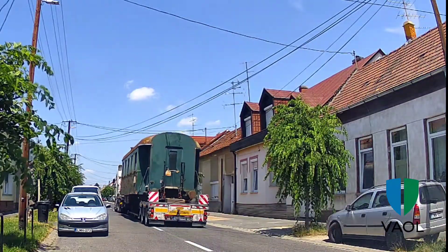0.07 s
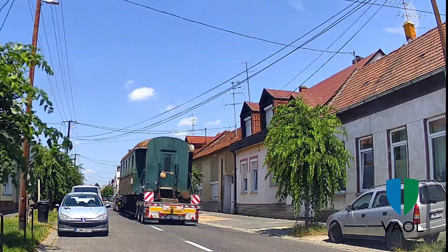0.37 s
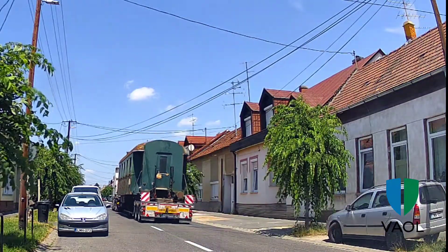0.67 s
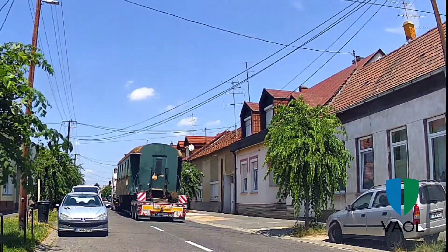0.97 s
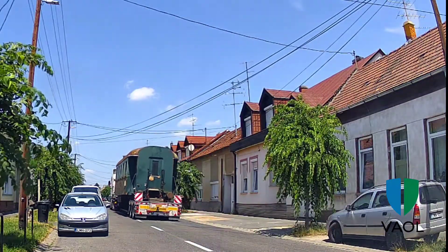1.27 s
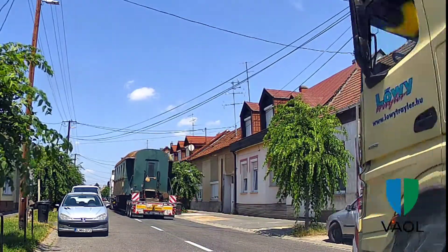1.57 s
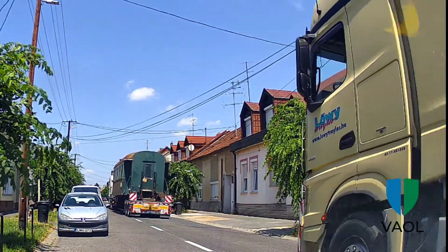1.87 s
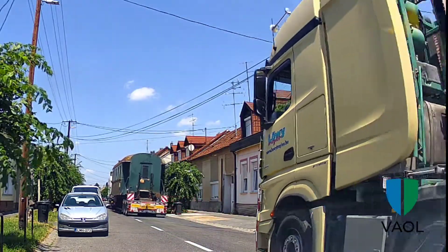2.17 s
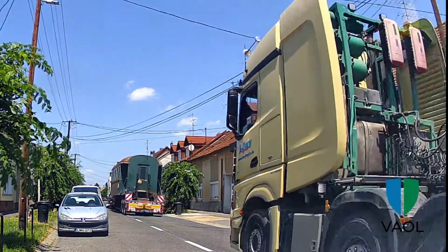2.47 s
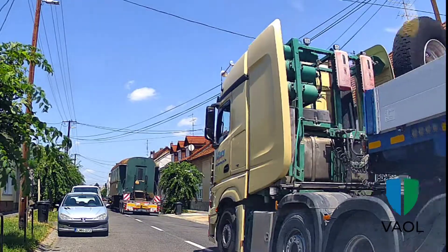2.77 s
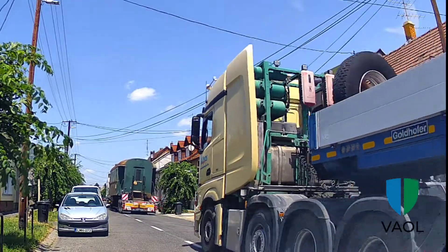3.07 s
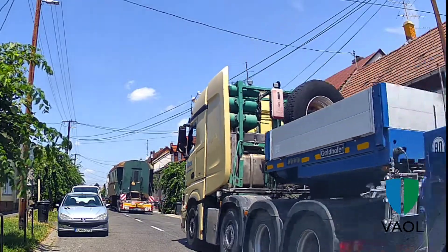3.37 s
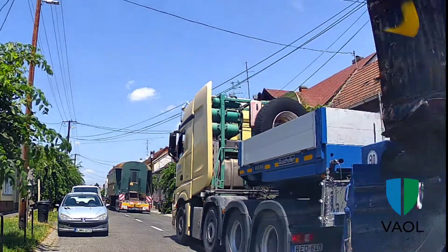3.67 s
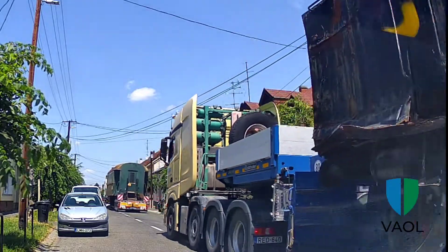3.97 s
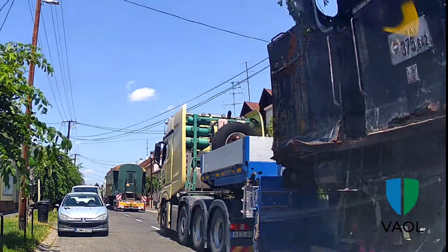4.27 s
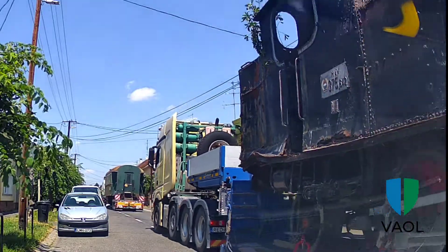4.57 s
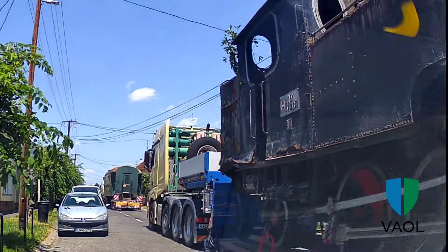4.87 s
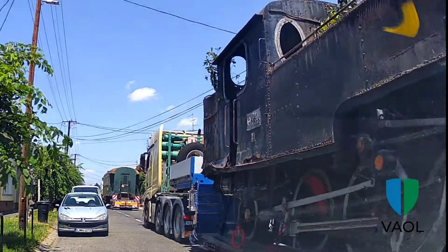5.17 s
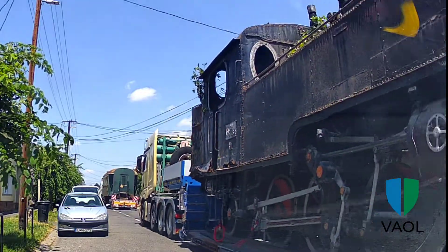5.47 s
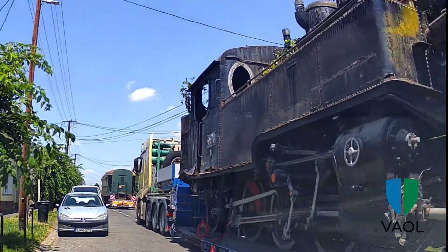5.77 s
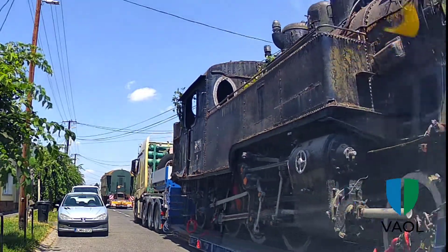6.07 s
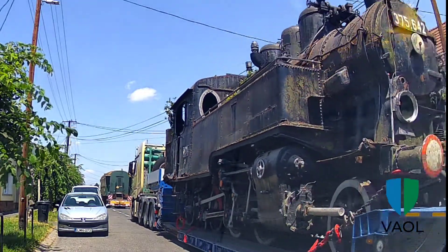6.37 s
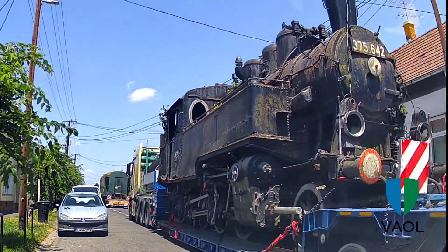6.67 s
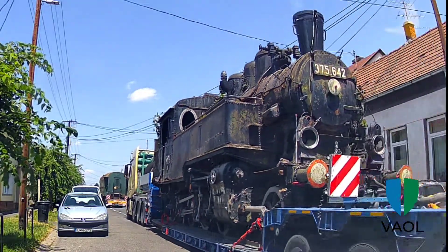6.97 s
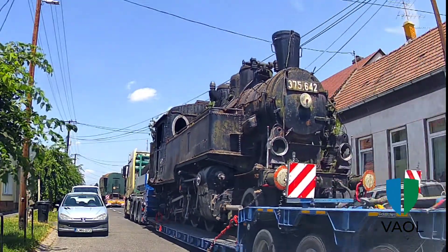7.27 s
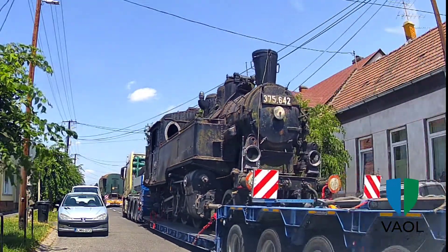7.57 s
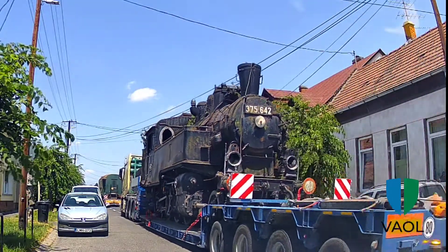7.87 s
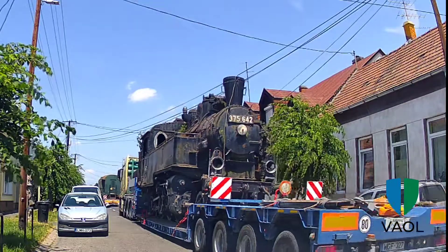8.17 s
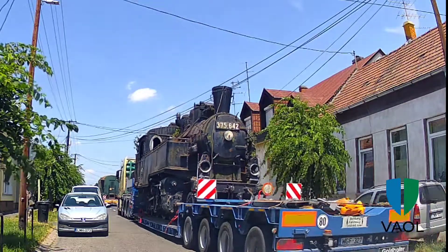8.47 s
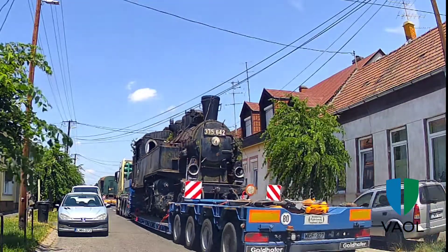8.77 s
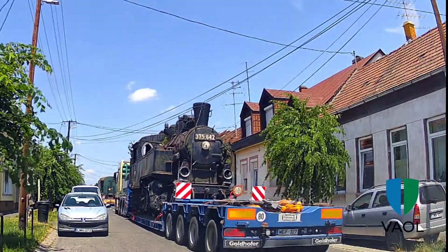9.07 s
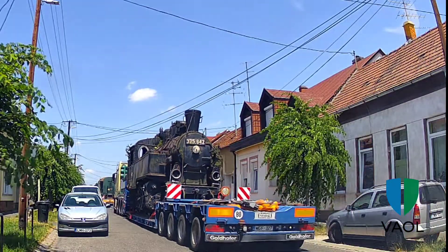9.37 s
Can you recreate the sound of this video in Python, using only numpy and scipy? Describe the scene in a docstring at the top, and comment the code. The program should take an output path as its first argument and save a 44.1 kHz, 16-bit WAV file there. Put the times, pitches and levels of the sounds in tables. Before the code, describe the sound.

The sound is heard from inside a closed, parked car and lasts about nine and a half seconds. From the start, air rushes evenly through the vents with a faint thin whine, over the low hum of the idling engine and fan. A heavy truck crawling past outside comes through as a dull, throbbing rumble that booms in the cabin throughout. A few soft, dull thuds sound in the car's body, near 0.1, 1.3, 2.1, 2.8, 6.8 and 8.5 seconds. Around 3 seconds a faint roar swells and fades as the tractor unit goes by; it swells again briefly near 6.4 seconds with the trailer's axles. Two faint, thin ringing tones from the truck come and go all along. The rumble lifts slightly near 4.5 and 9 seconds, but the overall level stays nearly steady to the end.

```python
"""Inside a parked car, a heavy truck crawling past outside. From the start air rushes through the vents
over the low tones of the four-cylinder idle and the blower wheel, while the closed body passes the street
as a dull, throbbing rumble with a few thuds. Near 3 s the tractor unit goes by and a faint roar swells;
near 6.4 s it swells again, briefly, with the trailer's axles. Two thin rings from the truck come and go
to the end, and the cabin booms on."""
import sys
import numpy as np
from scipy import signal
from scipy.fft import rfft, irfft, next_fast_len
from scipy.io import wavfile

SR = 44100
rng = np.random.default_rng(int(sys.argv[2]) if len(sys.argv) > 2 else 0)


def put_to_file(sound):
    """Save the sound as 16-bit audio at rate SR, in the file named by the first command-line argument."""
    columns = np.atleast_2d(sound).T  # one column per channel
    safe = np.clip(columns, -1, 1)
    whole_steps = np.round(safe * 32767)
    wavfile.write(sys.argv[1], SR, whole_steps.astype(np.int16))


N = 420273
TIME = np.arange(N) / SR


# spectra of the cabin air, the body and the panels: (frequency [Hz], relative density [dB])
BOOM_SPECTRUM = [(8, -33), (22, -27.5), (31, -20.5), (38, -6), (47, 0), (53, 0.5), (59, -1.5), (68, -3.5),
                 (85, -13.5), (130, -53.5)]
BODY_SPECTRUM = [(45, -33), (68, -9.5), (85, -2.5), (115, 0), (143, 1), (158, 0), (175, 1), (205, -2),
                 (225, -1), (243, -7.5), (290, -25.5), (400, -53.5)]
PANEL_SPECTRUM = [(150, -44.5), (240, -10.5), (255, -3), (268, 0), (302, -1.5), (330, -6), (362, -8),
                  (385, -5), (418, -8.5), (455, -15.5), (600, -42.5)]
# body rumble, nearly steady, swelling briefly near 4.5 s and 9.1 s: (time [s], level [dB])
BODY_LEVEL = [(0, -50.5), (0.8, -50.5), (1.9, -51), (2.1, -50), (3.2, -49.5), (4.1, -50.5), (4.45, -47.5),
              (4.9, -50.5), (6.1, -49.5), (6.4, -50.5), (7.0, -49), (8.3, -51), (8.7, -49.5), (9.1, -46.5),
              (9.3, -51), (9.53, -51)]
# panel drone: (time [s], level [dB])
PANEL_LEVEL = [(0, -52.5), (4.9, -53.5), (5.4, -52), (6.0, -52.5), (6.4, -51), (6.7, -51.5), (7.1, -51),
               (7.5, -53), (9.53, -53)]
# lulls of the boom, and of body and panels together: (centre time [s], duration [s], gain [dB])
BOOM_LULLS = [(0.6, .25, -7), (0.84, 0.23, -9), (1.76, .14, -8), (4.72, .22, -8), (5.39, .18, -6),
              (6.79, .25, -9), (8.72, 0.3, -13), (9.29, .2, -8)]
BODY_LULLS = [(0.02, .14, -1), (1.91, 0.24, -2.5), (2.69, .12, -5), (8.11, 0.15, -3), (8.41, 0.051, -4)]

def rumble(boom_db=-55.5):
    """Forced vibration: engines drive the low resonances of the cabin air, the body and its panels."""
    lull_db = swells(BODY_LULLS)
    boom = heaving(BOOM_SPECTRUM, boom_db + swells(BOOM_LULLS), calm=0.4, window_s=0.088)
    body = heaving(BODY_SPECTRUM, level_curve(BODY_LEVEL) + lull_db, calm=0.45, window_s=0.065)
    panels = heaving(PANEL_SPECTRUM, level_curve(PANEL_LEVEL) + lull_db, calm=0.39, window_s=0.082)
    return boom + body + panels


# soft throbs of the rumble: (crest time [s], frequency [Hz], duration [s], crest level [dB])
THROBS = [(0.669, 171, .09, -47.5), (0.93, 114, 0.11, -47.5), (1.589, 56, 0.12, -45),
          (1.59, 158, 0.072, -48), (1.859, 55, .1, -50), (2.022, 202, 0.049, -50), (2.53, 151, 0.14, -45),
          (2.775, 136, 0.051, -44), (3.058, 52, 0.17, -45.5), (3.104, 350, 0.092, -52.5),
          (3.18, 278, .09, -49), (3.256, 130, 0.081, -43), (3.411, 140, .07, -46), (3.654, 188, 0.085, -43),
          (3.679, 374, 0.17, -53), (3.869, 174, 0.076, -42), (4.306, 54, 0.13, -48),
          (4.393, 290, 0.12, -48.5), (5.1, 54, .13, -48), (5.383, 194, 0.11, -47),
          (5.934, 122, 0.09, -48.5), (6.27, 290, .09, -49), (6.37, 168, 0.098, -47), (6.407, 52, 0.25, -51),
          (6.57, 178, .09, -49), (6.82, 310, .1, -49), (6.905, 290, 0.062, -47), (6.933, 54, 0.17, -47.5),
          (7.672, 54.3, .14, -46), (7.715, 285, 0.098, -46), (7.894, 58, .07, -45.5), (8.004, 58, .06, -43),
          (8.165, 115, .05, -46.5), (8.26, 278, .11, -50.5), (8.552, 54, .15, -48),
          (8.911, 121, 0.086, -46), (8.986, 174, 0.12, -48.5)]

def throbs(spread_octaves=0.18):
    """Amplitude modulation: a narrow band of the rumble swells and sinks under a raised cosine."""
    size = SR // 2
    t = (np.arange(size) - size / 2) / SR
    hz = np.fft.rfftfreq(size, 1 / SR)
    out = np.zeros(N)
    for crest_s, pitch_hz, length_s, db in THROBS:
        swell = hump(t, length_s)
        band = np.exp(-.5 * (np.log2((hz + 1) / pitch_hz) / spread_octaves) ** 2)
        band_noise = irfft(rfft(rng.standard_normal(size)) * band, size)
        carrier = np.cos(np.angle(signal.hilbert(band_noise)))  # random phase, constant amplitude
        throb = irfft(rfft(swell * carrier) * np.sqrt(band), size)
        throb *= np.linalg.norm(swell) / np.linalg.norm(throb)
        add(out, crest_s + t[0], gain_of(db) * throb)
    return out


# dull thuds in the car's body: (time [s], frequency [Hz], peak level [dB])
THUDS = [(0.108, 194, -38.5), (1.334, 291, -38.5), (2.097, 203, -36), (2.837, 156, -34.5),
         (6.798, 335, -39.5), (8.467, 174, -35.5)]

def thuds(rise_s=0.0044, t60_s=0.097, sag=0.06):
    """Damped free vibration: a jolted panel rings briefly, sagging in pitch as it decays."""
    t = np.arange(SR // 4) / SR
    decay = gain_of(-60 * np.maximum(t - rise_s, 0) / t60_s)
    envelope = np.minimum(t / rise_s, 1) * decay
    glide = 1 + sag * (2 * decay - 1)
    out = np.zeros(N)
    for start_s, pitch_hz, db in THUDS:
        turns = np.cumsum(pitch_hz * glide) / SR
        add(out, start_s, gain_of(db) * envelope * np.sin(2 * np.pi * turns))
    return out


# rush of air at the vents: (frequency [Hz], relative density [dB])
AIR_SPECTRUM = [(20, -26.5), (120, -1.5), (480, -0.5), (950, -1), (1100, -7), (1350, -6.5), (1530, -10),
                (2150, -10), (2750, -15), (3050, -19), (4000, -17.5), (5100, -20.5), (6200, -17.5),
                (7600, -24.5)]
# resonances of ducts, vents and windscreen, and notches between: (frequency [Hz], width [Hz], gain [dB])
DUCT_RESONANCES = [(597, 42, 3), (699, 55, 3), (804, 36, 3), (872, 35, 3), (1010, 80, 2.5), (1053, 26, 4),
                   (1172, 94, 4.5), (1267, 81, 2.5), (1440, 85, 4.5), (1685, 71, 4.5), (1920, 44, 1),
                   (2095, 55, 4), (2232, 70, 3), (2379, 252, 10), (2548, 55, 4), (2664, 66, 6),
                   (2824, 190, 3), (3230, 87, 5), (3477, 83, 5), (3670, 310, 4), (4400, 170, 1.5),
                   (6850, 94, 4), (7300, 180, 2.5)]
DUCT_NOTCHES = [(755, 28, -1.5), (1340, 30, -2), (1531, 26, -3), (2003, 37, -1.5), (2150, 34, -2),
                (2710, 46, -2)]

def vents(level_db=-52, flutter_db=0.29):
    """Turbulence: an almost even airflow makes broadband noise, filtered by its path into the cabin."""
    def colour(hz):
        path_db = sum(db * .5 ** ((2 * (hz - centre) / width) ** 2)
                      for centre, width, db in DUCT_RESONANCES + DUCT_NOTCHES)
        return spectrum_at(AIR_SPECTRUM, hz) + path_db
    return gain_of(level_db + flutter_db * drift(5.5)) * noise(colour)


# engine (two firings a turn) and blower wheel: (order [multiple of shaft speed], rms level [dB])
IDLE_ORDERS = [(1, -78), (2, -68), (3, -75), (4, -61.5), (8, -71.5)]
BLOWER_ORDERS = [(1, -62), (2, -62), (3, -67.5)]
# faint steady hums: (frequency [Hz], rms level [dB])
HUMS = [(97.5, -65.5), (286, -65.5), (596.5, -73.3), (684, -76.5)]

def machines(crank_hz=13.05, blower_hz=59.55):
    """Periodic excitation: engine and blower sound at multiples of their shaft speeds, beside four hums."""
    engine = shaft(crank_hz, IDLE_ORDERS, wander=.002, waver_db=1.0)
    blower = shaft(blower_hz, BLOWER_ORDERS, wander=.0015, waver_db=-1.5)
    hums = sum(shaft(hz, [(1, db)], wander=.00098, waver_db=1.0) for hz, db in HUMS)
    return engine + blower + hums


# the truck's midrange roar: (frequency [Hz], relative density [dB])
ROAR_SPECTRUM = [(250, -25), (400, -2), (700, -0.5), (1000, -1.5), (1400, -6), (2200, -25.5)]
# the tractor unit, then the trailer's axles, going by: (crest time [s], duration [s], gain [dB])
ROAR_SWELLS = [(2.95, 1.2, 14), (6.39, .45, 16)]

def truck_roar(base_db=-74):
    """Airborne transmission: a little engine and tyre noise leaks in, most when the truck is closest."""
    return gain_of(base_db + swells(ROAR_SWELLS)) * noise(lambda hz: spectrum_at(ROAR_SPECTRUM, hz))


# lower ring, up as the tractor unit and later the trailer pass: (time [s], level [dB])
LOW_RING_LEVEL = [(0, -72), (0.6, -67), (1.0, -75), (1.6, -75), (2.25, -67), (3.7, -67.5), (3.95, -76),
                  (4.95, -76), (5.35, -65), (5.7, -77), (6.2, -73), (6.38, -65), (6.55, -67), (7.1, -67),
                  (7.3, -64), (7.55, -73), (7.93, -66), (8.2, -72), (8.9, -73), (9.2, -65), (9.53, -72)]
# swells of the higher ring: (crest time [s], duration [s], gain [dB])
HIGH_RING_SWELLS = [(0.5, .5, 8), (2.15, .6, 8), (2.96, 0.45, 10), (3.73, 0.4, 10), (4.15, .35, 8),
                    (4.62, .45, 9), (5.77, .45, 11.5), (6.38, .4, 10), (7.25, 0.74, 9), (7.96, .35, 9),
                    (9.12, .7, 7.5)]

def truck_rings(high_base_db=-76):
    """Mechanical resonance: two narrow bands ring faintly, coming and going as the truck passes."""
    low = narrow_band(centre_hz=1254, width_hz=40, wander=.003, waver_db=0.3)
    high = narrow_band(centre_hz=1444, width_hz=44, wander=.006, waver_db=-0.1)
    high_db = high_base_db + swells(HIGH_RING_SWELLS)
    return gain_of(level_curve(LOW_RING_LEVEL)) * low + gain_of(high_db) * high


def vent_whine(level_db=-71):
    """Flow noise: air at a vent sounds in a band so narrow that it is heard as a thin pitch."""
    return gain_of(level_db) * narrow_band(centre_hz=2364, width_hz=28, wander=.008, waver_db=2.0)


def heaving(spectrum, level_db, calm, window_s):
    """Envelope fluctuation: low noise heaves at random; calm (0-1) compresses its swells."""
    x = noise(lambda hz: spectrum_at(spectrum, hz))
    power = coloured(x ** 2, lambda hz: low_pass_db(hz * window_s))
    compressed = x / np.maximum(power, 1) ** (calm / 2)
    return gain_of(level_db) * unit_rms(compressed)


def shaft(speed_hz, orders, wander, waver_db):
    """Harmonic series: tones locked to one wandering shaft speed, each wavering in level."""
    turns = np.cumsum(speed_hz * (1 + wander * drift(0.83))) / SR
    out = np.zeros(N)
    for order, db in orders:
        amplitude = np.sqrt(2) * gain_of(db + waver_db * drift(1.8))
        out += amplitude * np.sin(2 * np.pi * (order * turns + rng.random()))
    return out


def narrow_band(centre_hz, width_hz, wander, waver_db):
    """Quadrature modulation: slow noise on a wandering carrier gives a narrow, wavering band."""
    phase = 2 * np.pi * np.cumsum(centre_hz * (1 + wander * drift(4.054))) / SR
    band = drift(width_hz) * np.cos(phase) + drift(width_hz) * np.sin(phase)
    return gain_of(waver_db * drift(2.9)) * band


def drift(rate_hz):
    """Low-pass noise: a random fluctuation of unit rms, mostly slower than the rate."""
    return noise(lambda hz: low_pass_db(hz / rate_hz))


def low_pass_db(ratio):
    """Gaussian low-pass response, 12 dB down at a frequency ratio of one."""
    return -12 * np.minimum(ratio, 4) ** 2


def noise(db_at):
    """Spectral shaping of white noise, at unit rms."""
    return unit_rms(coloured(rng.standard_normal(N), db_at))


def coloured(x, db_at):
    """Zero-phase filtering by a function from Hz to dB."""
    size = next_fast_len(N)
    response = gain_of(db_at(np.fft.rfftfreq(size, 1 / SR)))
    return irfft(rfft(x, size) * response, size)[:N]


def spectrum_at(points, hz):
    """Linear interpolation of dB on a log-frequency axis."""
    knots_hz, db = np.transpose(points)
    return np.interp(np.log(hz + 1), np.log(knots_hz + 1), db)


def level_curve(points):
    """Linear interpolation of dB over time."""
    return np.interp(TIME, *np.transpose(points))


def swells(rows):
    """Gain in dB that leaves zero in smooth humps or hollows."""
    return sum(db * hump(TIME - centre_s, length_s) for centre_s, length_s, db in rows)


def hump(t, length_s):
    """Raised-cosine window centred on t = 0."""
    return np.cos(np.pi * np.clip(t / length_s, -.5, .5)) ** 2


def gain_of(db):
    """Decibels to amplitude."""
    return 10 ** (np.asarray(db) / 20)


def unit_rms(x):
    """Normalisation to an rms of one."""
    return x / np.sqrt(np.mean(x ** 2) + 1e-20)


def add(mix, start_s, sound):
    """Superposition of a sound from a given time on."""
    part = mix[max(round(start_s * SR), 0):][:len(sound)]
    part += sound[:len(part)]


def scene():
    """Superposition: the pressures of all sources add behind the windscreen."""
    return (machines() + vents() + truck_rings() + vent_whine()
            + rumble() + truck_roar() + throbs() + thuds())[None]


# the recorder's treble response: (frequency [Hz], gain [dB])
TREBLE_ROLL_OFF = [(7600, 0), (7900, -7), (8350, -10.5), (8750, -22.5), (9000, -28.5)]
# a very faint, even hiss under everything: (frequency [Hz], relative density [dB])
HISS_SPECTRUM = [(20, 0.5), (15300, -1), (15900, -13), (17000, -40.5)]

def record(dry, edge_hz=8950, hiss_db=-99):
    """Band limiting: the treble rolls off, then cuts steeply; a very faint hiss lies under everything."""
    dull = coloured(dry[0], lambda hz: spectrum_at(TREBLE_ROLL_OFF, hz))
    low_pass = signal.firwin(511, edge_hz, window=("kaiser", 9), fs=SR)
    limited = signal.oaconvolve(dull, low_pass, "same")
    hiss = gain_of(hiss_db) * noise(lambda hz: spectrum_at(HISS_SPECTRUM, hz))
    return (limited + hiss)[None]


dry = scene()
out = record(dry)
put_to_file(out)
```